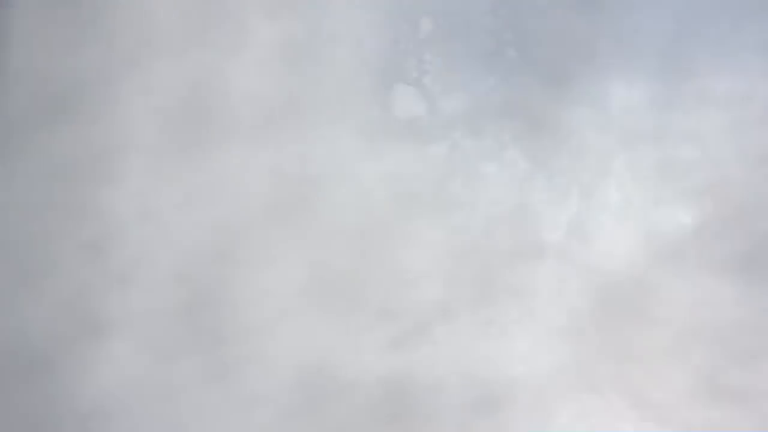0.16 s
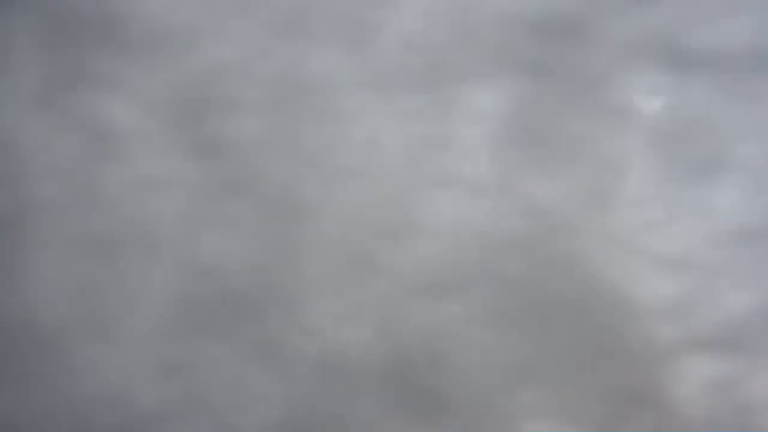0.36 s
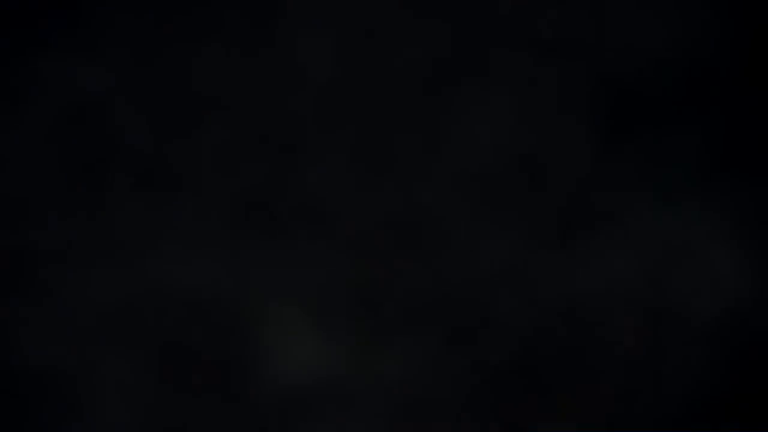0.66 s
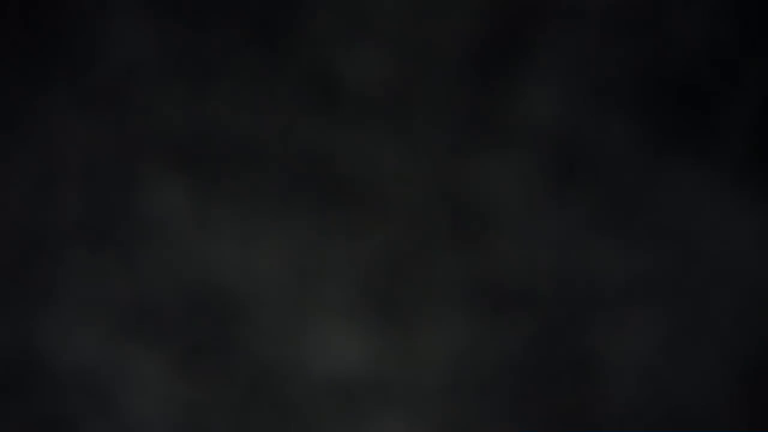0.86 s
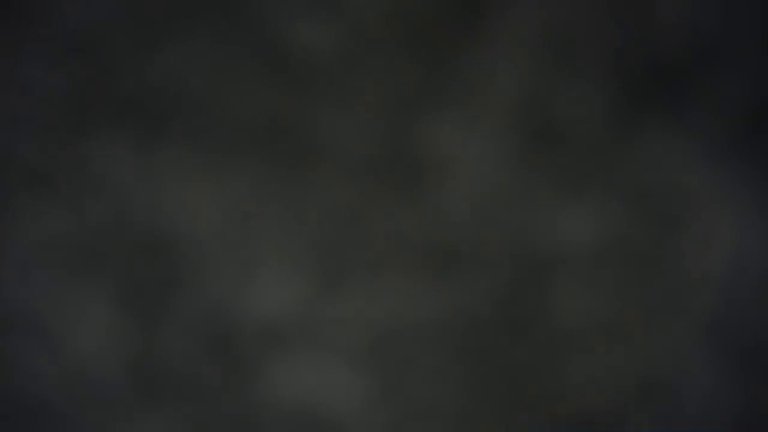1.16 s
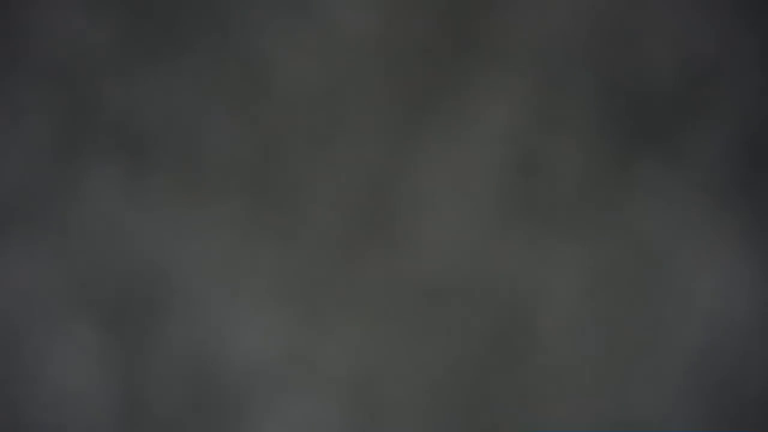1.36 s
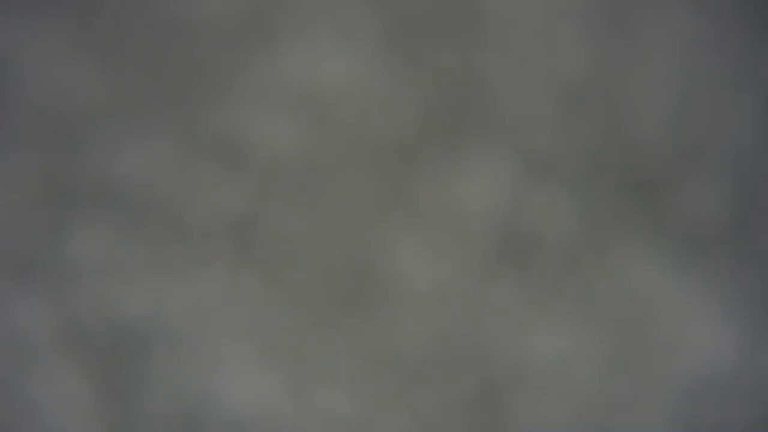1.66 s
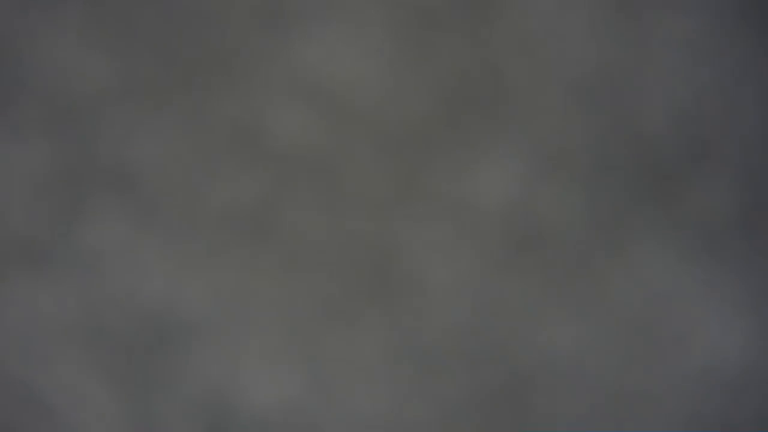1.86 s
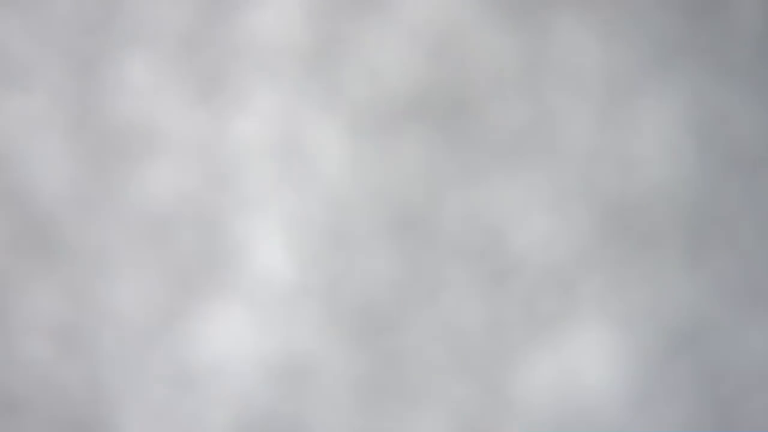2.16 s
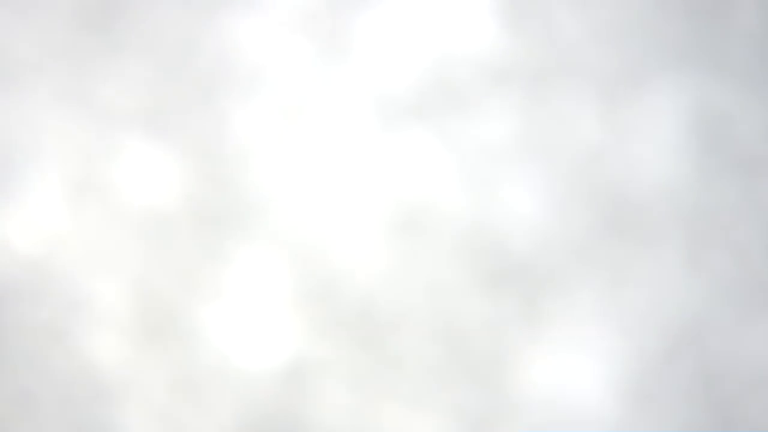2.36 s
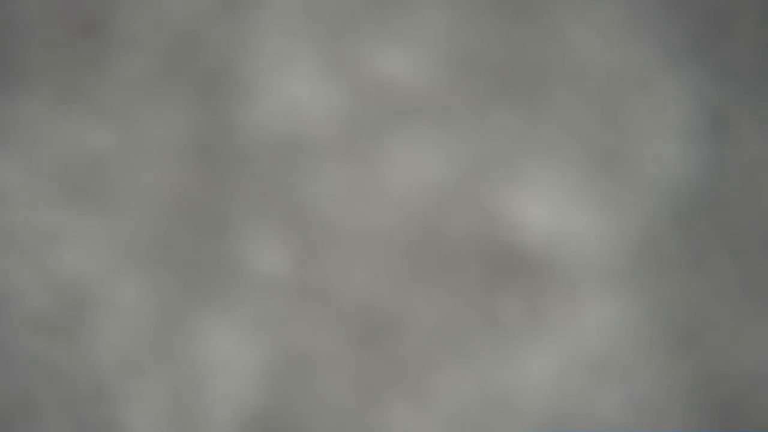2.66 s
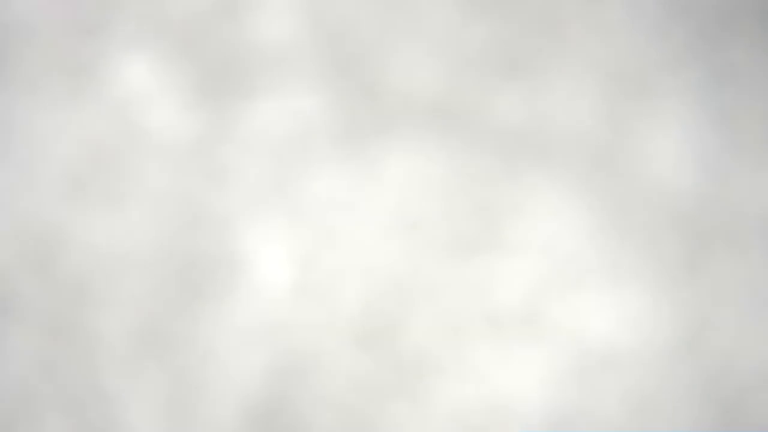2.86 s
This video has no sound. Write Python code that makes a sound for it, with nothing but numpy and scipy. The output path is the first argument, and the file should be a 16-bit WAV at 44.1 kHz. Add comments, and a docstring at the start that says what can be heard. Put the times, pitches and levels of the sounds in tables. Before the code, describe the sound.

Avalanche snow scrapes over a helmet camera: gritty rasp and crunches build to a loud juddering slam, drop to near silence while buried, then scraping returns with light knocks. Close, dry, mono microphone inside the housing.

```python
"""Helmet camera in an avalanche

Inside the sliding snow, one microphone in the camera housing, the snow right against its port.
Grains rasp as hails of random clicks coloured by housing and port; breaking crusts add short bursts.
Packed snow heaves and rumbles as slowly swelling low noise; lumps, and a mount that judders and slams
to rest, ring decaying modes. Brief whistles of narrow noise and the microphone's own hiss lie beneath.
"""
import sys
import numpy as np
from scipy import signal
from scipy.fft import rfft, irfft, next_fast_len
from scipy.io import wavfile
from scipy.ndimage import uniform_filter1d, map_coordinates

SR = 44100
rng = np.random.default_rng(int(sys.argv[2]) if len(sys.argv) > 2 else 0)


def master(y):
    """Save y as 16-bit WAV."""
    cut = np.clip(np.atleast_2d(y).T, -1, 1)
    pcm = np.round(cut * 32767)  # scale
    wavfile.write(sys.argv[1], SR, pcm.astype(np.int16))


def gain_from_decibels(decibels):
    """Convert decibel values to linear amplitude factors."""
    exponent = np.asarray(decibels, float) / 20
    return 10 ** exponent


N = 132300  # 3 s

# snow sliding past: t/s, rasp on the housing level/dB, then levels over that rasp:
# hiss at the port/dB, top treble/dB, churn/dB
SLIDING_SNOW = [(0.0, -52.5, -1, -4.5, -12.5), (0.17, -46.5, -6, -12, -11.5), (0.22, -41, 2.5, 0, -9),
                (0.27, -34.5, -1, -7, -34), (0.3, -39, 3.5, 0, -51), (0.35, -32, 5, 0.5, -8),
                (0.41, -35, 4.5, 0.5, -35), (0.49, -34, 8.5, 2.5, -34), (0.51, -35, 9, 3, 15),
                (0.52, -25, 3.5, -19, -3), (0.53, -25.5, -2.5, -7, -7.5), (0.57, -43.5, 12.5, -2.5, 10.5),
                (0.58, -35.5, -0.5, -6, -10), (0.62, -34, 5.5, -11, -9), (0.64, -29, -5.5, -15, -15),
                (0.67, -48.5, -1.5, -9.5, -7.5), (0.74, -56.5, -5.5, -12, -10), (0.78, -38, -6, -15, -9.5),
                (0.84, -61.5, -1.5, -14, -2), (1.24, -56.5, -8, -21.5, -8.5), (1.45, -44.5, -9, -17.5, -11),
                (1.66, -47.5, -7, -18, -12), (1.75, -61.5, -10, -17, -2.5), (1.85, -61, -4, -9, -3.5),
                (1.91, -49, -16, -21, -12), (1.95, -47, -4, -15, -10), (2.0, -49, -5, -16, -9),
                (2.06, -38, -3, -12.5, -9), (2.1, -37.5, 2, -9.5, -11.5), (2.2, -38, -6, -10, -21),
                (2.23, -40, -3.5, -9, -11), (2.26, -42, -6, -7.5, -12.5), (2.3, -39.5, -8.5, -12, -14.5),
                (2.39, -37, -5.5, -11.5, -14.5), (2.48, -28.5, 0, -6, -19), (2.56, -28.5, -2, -5.5, -18.5),
                (2.65, -33.5, 5, 2, -2.5), (2.7, -27, -0.5, -5.5, -8), (2.75, -34, -3, -9, -10),
                (2.83, -44.5, 1, 0, -8), (3.0, -37, -5.5, -5, -14)]
# snow pressing on the diaphragm, before the trims in press(): t/s, heave level/dB, rumble level/dB
PRESSING_SNOW = [(0.0, -35, -46.5), (0.05, -36, -35.5), (0.16, -36.5, -44), (0.3, -26.5, -35.5),
                 (0.32, -20.5, -41.5), (0.36, -27, -30), (0.4, -32, -38), (0.48, -41, -40),
                 (0.51, -42, -18.5), (0.565, -34, -21), (0.58, -34, -38), (0.63, -20.5, -44),
                 (0.68, -31.5, -44), (0.72, -35, -49), (0.78, -25, -28.5), (0.79, -19.5, -40.5),
                 (0.9, -47, -71), (0.99, -73, -61), (1.13, -52.5, -60.5), (1.59, -59.5, -53.5),
                 (1.75, -49.5, -55.5), (1.95, -35.5, -49), (2.01, -53, -52), (2.06, -38, -43.5),
                 (2.11, -40.5, -46), (2.22, -46, -42), (2.25, -49, -54), (2.38, -39.5, -57),
                 (2.46, -26.5, -38), (2.51, -42.5, -42), (2.6, -41, -37), (2.69, -25.5, -37),
                 (2.75, -36, -45), (2.92, -43.5, -51.5), (2.97, -47, -44), (3.0, -36, -42)]
# colours of the noise, relative: f/Hz, level/dB
HOUSING_COLOUR = [(620, -59), (1050, -14), (1150, -14), (1300, -7.5), (1640, 1.5), (1880, 1), (3600, -4.5),
                  (4680, -68), (7920, -120)]
PORT_COLOUR = [(1760, -14), (3000, -6), (3460, -2), (3780, -2.5), (4230, 0), (4900, -3.5), (5640, -1),
               (6970, -8.5), (7800, -21.5), (10100, -33), (17200, -120)]
TOP_COLOUR = [(4290, -32.5), (7300, -5.5), (8000, -9), (8780, -2), (10600, -6), (12000, -4.5),
              (14600, -12.5), (15600, -18.5)]
CHURN_COLOUR = [(160, -28), (280, -3.5), (426, -3.5), (589, -8.5), (788, -3), (1200, -8.5), (1560, -4.5),
                (2640, -120)]
HEAVE_COLOUR = [(4.7, -36.5), (8.0, -7), (27, 19), (49, -5.5), (65, 0), (84, -35.5), (140, -120)]
RUMBLE_COLOUR = [(32, -47), (55, -0.5), (183, -9), (221, -15), (280, -12.5), (320, -20), (420, -53),
                 (700, -120)]
# bursts of grains on the port, from breaking crusts (short) to passing flurries (long):
# t/s, level before CRUNCH_DB and the rise/dB, treble over the housing/dB, t60/s
CRUNCHES = [(0.216, -38, 13, 0.012), (0.229, -29, 5, 0.022), (.251, -21.5, 8, .015),
            (0.3114, -25.5, 21.5, 0.013), (0.338, -20, 4, 0.018), (0.353, -12, 4, 0.022),
            (0.375, -17.5, 16, 0.0088), (0.463, -19, 9, .015), (.476, -15, 11, 0.013),
            (.496, -33, 8, 0.013), (0.5083, -2.5, -2, 0.014), (0.518, -0.5, 2.5, 0.013),
            (.5285, -4, -5, .014), (0.6189, -12, 0, 0.02), (.7575, -34, -4, 0.018),
            (0.7697, -22, 2.5, 0.015), (.773, -32, -1, 0.13), (.93, -44, -0.5, 0.54), (1.14, -42, -6, 0.43),
            (1.795, -40, -7.5, 0.093), (1.865, -40.5, -1.5, 0.13), (1.932, -40.5, 7.5, 0.064),
            (2.052, -48, 6, 0.037), (2.656, -23, 7, 0.024), (2.695, -20, -4, 0.045)]
CRUNCH_DB, CRUNCH_RISE = -5.5, 0.16  # trim of all bursts/dB; time constant of the rise, share of t60
# knocks on the housing: lumps hitting it, and the mount slamming to rest (0.57 s):
# t/s, relative level/dB, contact/s
HOUSING_KNOCKS = [(0.354, -12.5, 0.0022), (0.57, -8.5, 0.0018), (0.6044, -12, 0.0045),
                  (0.66, -11.5, 0.0072), (0.7557, -26, 0.0043), (0.7685, -5.5, 0.0055), (2.056, -36, 0.002),
                  (2.14, -28.5, 0.0013), (2.1538, -31, .002), (2.2075, -25.5, 0.0016), (2.219, -25, 0.0016),
                  (2.452, -33, 0.0019), (2.69, -39, 0.0015)]
# ringing modes of the mount: f/Hz, level/dB, t60/s
MOUNT_MODES = [(81.3, -5, 0.16), (126, 0, 0.025), (192, 1.5, 0.023), (304, -3, 0.02), (432, -5, 0.017),
               (580, -8, 0.025), (780, -16, 0.02)]
# air pocket in the snow before the port: t/s, pitch f/Hz, its ring before evening out level/dB
AIR_POCKET = [(.0, 2430, 12.5), (.2, 2250, 19), (.28, 2270, 14), (.36, 2260, 14), (.45, 1990, 10),
              (.52, 2250, 21), (.62, 2376, 7.5), (.78, 2780, 4), (1.0, 2300, 9.5), (1.3, 2160, 0.5),
              (1.55, 1800, 4.5), (1.75, 2270, 4), (2.05, 2410, 8.5), (2.2, 1770, -1.5), (2.32, 1650, 5.5),
              (2.48, 1640, 10), (2.57, 1510, 3.5), (2.62, 1400, 1), (2.65, 1500, -18), (2.67, 2780, 10),
              (2.72, 2660, 11), (2.85, 2310, 3), (3.0, 2480, 6.5)]
POCKET_WIDTH = 0.2  # half-width of the ring, share of its pitch
# snow squeezing past the port: centre t/s, length/s, pitch f/Hz, half-width f/Hz, level/dB
PORT_WHISTLES = [(0.777, 0.031, 780, 60, -46), (2.35, 0.12, 9400, 900, -46),
                 (2.533, 0.069, 2530, 90, -32.5), (2.611, 0.041, 1175, 90, -32.5)]

# judder: the mount rocks, and the second edge of each rock lands just after the first
JUDDER_START_S, JUDDER_PER_S, JUDDER_ROCKS, JUDDER_CONTACT_S = 0.5045, 40, 3, 0.0021
JUDDER_DB, JUDDER_GROWS_DB = -7.5, 1.5  # relative level of the first rock; growth per rock
SECOND_EDGE_S, SECOND_EDGE_DB = 0.01034, -0.5  # delay and level after the first edge
SCATTER_DB = 1.5  # random scatter of each mode per blow
VENT_HZ = 48  # the vent of the microphone lets slow pushes of the housing leak away

GRAINS_PER_S, GRAIN_SPREAD_DB = 9000, 3.5  # mean rate; spread of the grain sizes
CLUMP_DB, BROAD_PATCH_DB = 1.6, 1.6  # depth of the clumps; bound of the broad patches of colour
HISS_DB, HISS_TOP_HZ = -69, 9000  # the microphone's own hiss, at half amplitude at this frequency
CEILING = 0.75  # full swing of the microphone


def unit(x):
    """x scaled to rms 1."""
    return x / np.sqrt(np.mean(x ** 2) + 1e-20)


def along(points, hz):
    """Values of (Hz, value) points, interpolated on a log frequency axis."""
    f, v = np.transpose(points)
    return np.interp(np.log(hz + 1), np.log(f + 1), v)


def curves(rows):
    """One value per sample for each column after the time."""
    s, *cols = np.transpose(rows)
    return [np.interp(np.arange(N) / SR, s, c) for c in cols]


def wobble(rate):
    """A smooth random curve, rate knots a second."""
    knots = rng.standard_normal(int(N * rate / SR) + 4)
    return map_coordinates(knots, [np.arange(N) * rate / SR])


def filtered(x, response):
    """x times a complex response of frequency."""
    m = next_fast_len(N + SR // 2)
    return irfft(rfft(x, m) * response(np.fft.rfftfreq(m, 1 / SR)), m)[..., :N]


def coloured(x, spectrum):
    """x in the given colour, rms 1."""
    return unit(filtered(x, lambda hz: gain_from_decibels(along(spectrum, hz))))


def steadied(x, hold_s):
    """x with its own slow swells evened out."""
    power = uniform_filter1d(x ** 2, size=int(hold_s * SR))
    return x / np.sqrt(np.abs(power) + 0.15)


def patched(x, size, patchy_db, bins, frames):
    """x with a bounded random gain over patches of time and frequency."""
    z = signal.stft(x, nperseg=size)[2]
    field = uniform_filter1d(rng.standard_normal(z.shape), size=bins, axis=0)
    field = uniform_filter1d(field, size=frames, axis=1)
    return signal.istft(z * gain_from_decibels(patchy_db * np.tanh(unit(field))), nperseg=size)[1][:N]


def hiss():
    """The microphone's own noise, white with a fading top."""
    return filtered(rng.standard_normal(N), lambda hz: gain_from_decibels(HISS_DB) / (1 + (hz / HISS_TOP_HZ) ** 2))


def whistles():
    """Snow squeezing past the port makes narrow noise that swells and fades."""
    t, out = np.arange(N) / SR, np.zeros(N)
    for s, length, pitch, width, db in PORT_WHISTLES:
        noise = filtered(rng.standard_normal(N), lambda f: 1 / (1 + ((f - pitch) / width) ** 2))
        swell = np.exp(-(2 * (t - s) / length) ** 2)
        out += gain_from_decibels(db) * swell * unit(noise)
    return out


def press():
    """The weight of snow pumps the diaphragm slowly and rumbles through the helmet."""
    heave_db, rumble_db = curves(PRESSING_SNOW)
    heave = steadied(coloured(rng.standard_normal(N), HEAVE_COLOUR), hold_s=0.061)
    # fine patches turn the noise into wandering low tones
    tones = patched(rng.standard_normal(N), size=8192, patchy_db=10, bins=2, frames=2)
    rumble = steadied(coloured(tones, RUMBLE_COLOUR), hold_s=0.03)
    heave_gain = gain_from_decibels(heave_db - 2.5 + 1.54 * wobble(8.78))
    rumble_gain = gain_from_decibels(rumble_db - 4.0 + 1.16 * wobble(25.54))
    return heave_gain * heave + rumble_gain * rumble


def judder():
    """The mount rocks at a steady rate, each rock landing on two edges: (s, dB, contact s) per edge."""
    edges = []
    for k in range(JUDDER_ROCKS):
        for edge in range(2):
            s = JUDDER_START_S + k / JUDDER_PER_S + edge * SECOND_EDGE_S
            db = JUDDER_DB + JUDDER_GROWS_DB * k + edge * SECOND_EDGE_DB
            edges.append((s, db, JUDDER_CONTACT_S))
    return edges


def knocks():
    """Every knock and every edge of the judder is a soft push that rings the modes of the mount."""
    out, t = np.zeros(N + SR), np.arange(SR // 4) / SR
    for s, db, contact_s in list(HOUSING_KNOCKS) + judder():
        ring = np.zeros(len(t))
        for hz, level, t60 in MOUNT_MODES:
            decay = gain_from_decibels(level + rng.normal(0, SCATTER_DB) - 60 * t / t60)
            ring += decay * np.sin(2 * np.pi * hz * t)
        push = np.hanning(int(contact_s * SR) + 3)
        blow = np.convolve(ring, push / push.sum())[:len(t)]
        out[round(s * SR):][:len(t)] -= gain_from_decibels(db - 7) * blow
    return filtered(out[:N], lambda f: (1j * f / (1j * f + VENT_HZ)) ** 2)


def grains(modes_db):
    """A dense hail of snow grains in clumps, with random broad and fine patches of colour."""
    strike, side, size = rng.random((3, N))
    hail = (strike < GRAINS_PER_S / SR) * np.sign(side - 0.5)
    hail = hail * gain_from_decibels(-GRAIN_SPREAD_DB * np.log(size + 0.021))
    hail = patched(hail, size=8192, patchy_db=modes_db, bins=2, frames=2)
    clumped = hail * gain_from_decibels(CLUMP_DB * wobble(90))
    return patched(clumped, size=512, patchy_db=BROAD_PATCH_DB, bins=6, frames=26)


def crunch():
    """Breaking crusts and flurries throw bursts of grains: their swell on the housing and in the treble."""
    t, out = np.arange(N) / SR, np.zeros((2, N))
    for s, db, treble_db, t60 in CRUNCHES:
        since = np.clip(t - s, 0, None)
        rise = 1 - np.exp(-since / (CRUNCH_RISE * t60))
        swell = gain_from_decibels(db + CRUNCH_DB - 60 * since / t60) * rise
        out += gain_from_decibels([[0], [treble_db]]) * swell
    return out


def pocket(x):
    """A resonance that moves as the air pocket changes shape."""
    hz, t, z = signal.stft(x, SR, nperseg=512)
    s, pitch, db = np.transpose(AIR_POCKET)
    pitch, db = np.interp(t, s, pitch), np.interp(t, s, db)
    gain = gain_from_decibels(db / (1 + ((hz[:, None] / pitch - 1) / POCKET_WIDTH) ** 2))
    gain /= np.sqrt(np.mean(gain[12:40] ** 2, axis=0))  # even out the gain over about 1-3.4 kHz
    return signal.istft(z * gain, SR, nperseg=512)[1][:N]


def rasp():
    """Grains ring the housing and hiss in the port; lumps of snow churn below."""
    slide_db, port_db, top_db, churn_db = curves(SLIDING_SNOW)
    hail, bursts, spray = grains(modes_db=10.5), grains(modes_db=15.5), grains(modes_db=12.0)
    housing_swell, treble_swell = crunch()

    slide = unit(pocket(coloured(hail, HOUSING_COLOUR)))
    slide += gain_from_decibels(port_db) * coloured(spray, PORT_COLOUR)
    slide += gain_from_decibels(top_db) * coloured(spray, TOP_COLOUR)
    churn = gain_from_decibels(churn_db + 1.4 * wobble(30.05)) * coloured(hail, CHURN_COLOUR)

    burst_body = pocket(coloured(bursts, HOUSING_COLOUR))
    burst_treble = coloured(bursts, PORT_COLOUR) + gain_from_decibels(-6.5) * coloured(bursts, TOP_COLOUR)
    return gain_from_decibels(slide_db) * (slide + churn) + housing_swell * burst_body + treble_swell * burst_treble


def scene():
    """One microphone on both channels."""
    mono = hiss() + whistles() + press() + knocks() + rasp()
    return np.array([mono, mono])


def roll_off(x):
    """The treble ends steeply here."""
    return signal.sosfilt(signal.butter(12, 15700, fs=SR, output="sos"), x)


def record(dry):
    """The microphone rounds off the hardest blows as they near its full swing."""
    soft = dry / (1 + np.abs(dry / CEILING) ** 4) ** (1 / 4)
    return roll_off(soft)


dry = scene()
out = record(dry)
master(out)
```